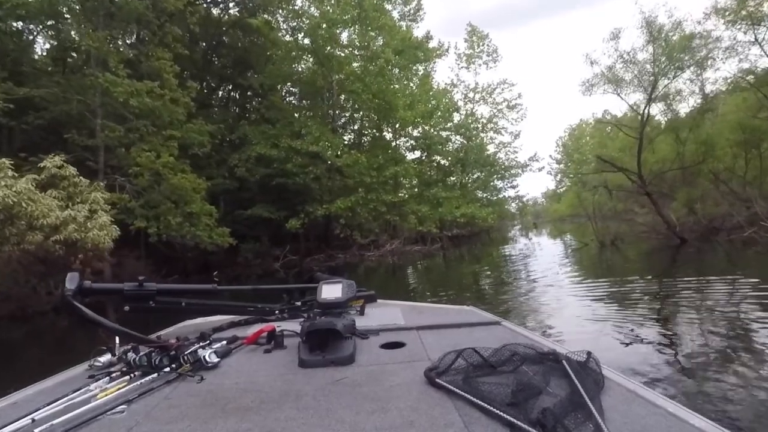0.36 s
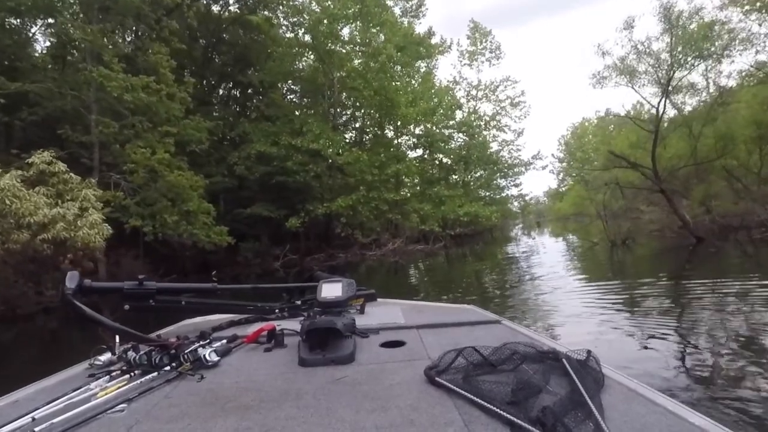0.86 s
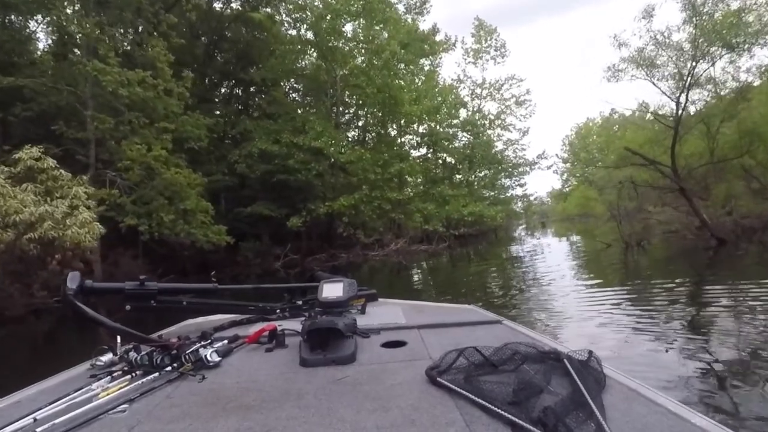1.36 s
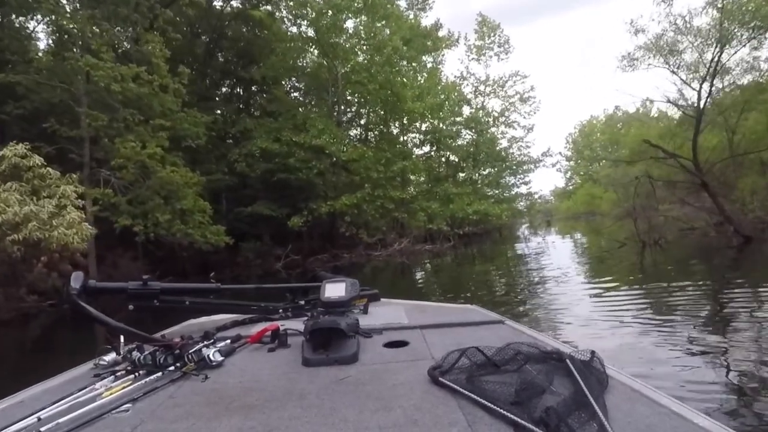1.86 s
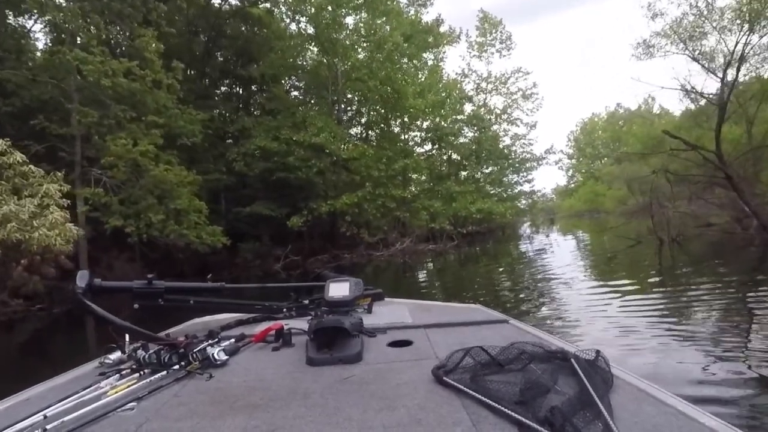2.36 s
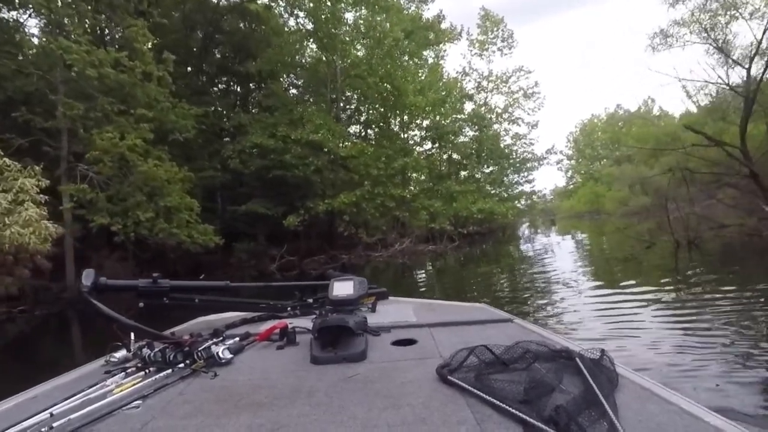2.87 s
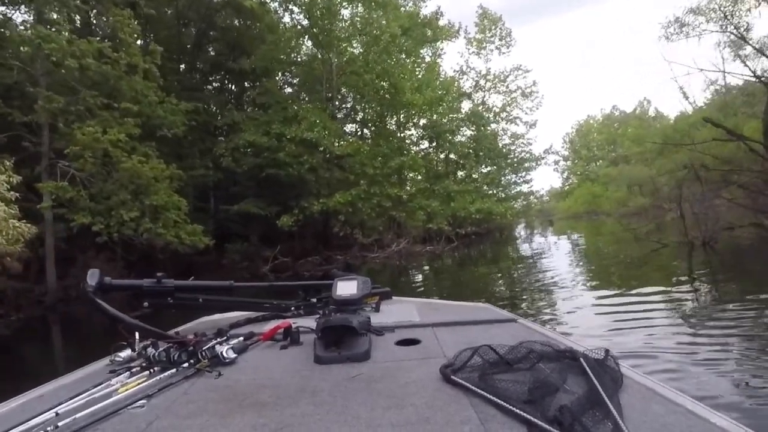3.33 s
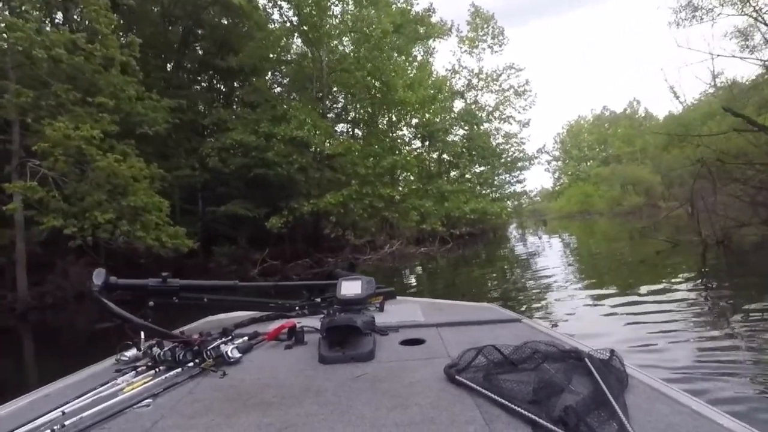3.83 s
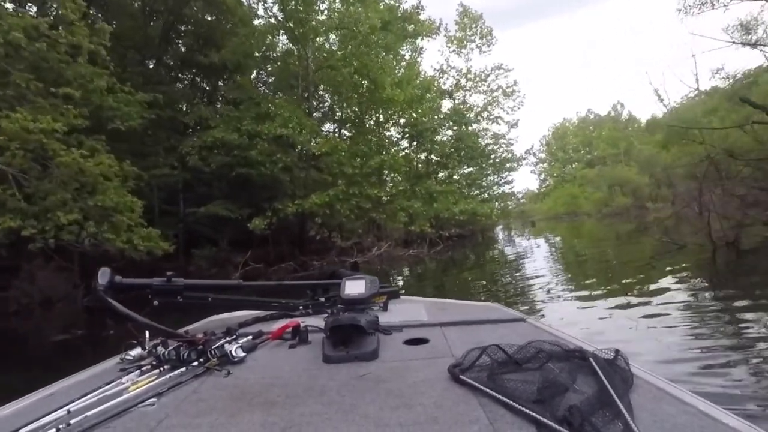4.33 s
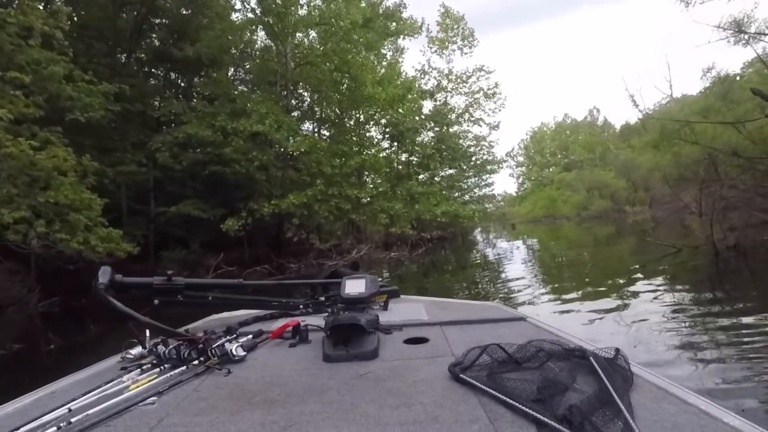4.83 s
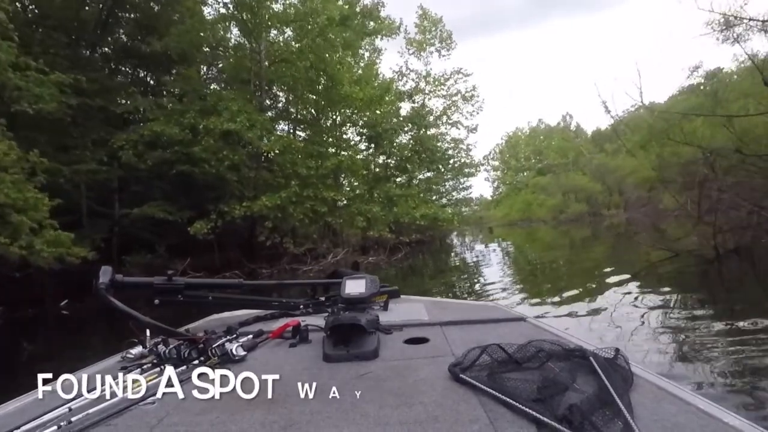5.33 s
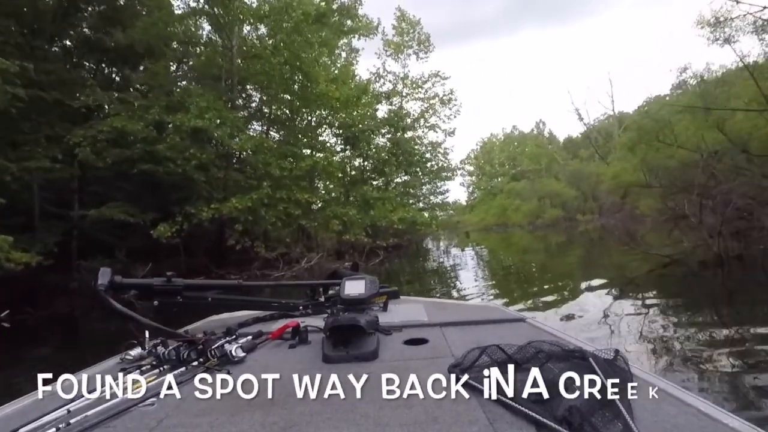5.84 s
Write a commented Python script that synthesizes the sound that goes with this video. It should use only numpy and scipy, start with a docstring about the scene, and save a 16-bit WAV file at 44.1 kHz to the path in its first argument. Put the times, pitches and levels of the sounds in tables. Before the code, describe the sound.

Deep, fluttering boat motor drone with hollow hull booms, irregular deck clunks, small bubbles and spray, and a very faint bird late on.

```python
"""Up a creek, on the deck of a fishing boat with its outboard idling; a small microphone with two ports stands there.
Motor noise runs through deck, hatch and cowl resonances; firings and wavelets keep the hull's low modes
humming, the cowl hisses and ticks with the firings. Padded blows of loose gear ring the deck, a fitting pings.
Bubbles are rising blips, spray is bursts of noise, a far bird whistles falling notes.
Air reaches both ports alike; deck shake moves them in opposition."""
import sys
import numpy as np
from scipy import signal
from scipy.fft import rfft, irfft, next_fast_len
from scipy.io import wavfile
from scipy.ndimage import uniform_filter1d

SR = 44100
rng = np.random.default_rng(int(sys.argv[2]) if len(sys.argv) > 2 else 0)


def transcribe(u):
    """Save the signal u as a 16-bit wav file named by the first command-line argument.

    u: samples, shape (n,) or (channels, n), limited to [-1, 1]; the rate is SR.
    q: integer samples, one column per channel.
    """
    v = np.clip(np.atleast_2d(u).T, -1, 1)
    q = np.round(v * 32767).astype(np.int16)
    wavfile.write(sys.argv[1], SR, q)


def linear_from_db(decibels):
    """Turn decibels (scalar or array-like) into linear amplitude factors; 0 gives 1."""
    return 10 ** (np.asarray(decibels, float) / 20)


N = 262395
T = np.arange(N) / SR

# low modes of the hull: (pitch [Hz], pitch wander [Hz], right port leads by [rad], left minus right [dB])
HULL_MODES = [(40.7, 1.5, 0.89, -1), (71.47, 1.7, 0.25, 2.5), (124, 1.97, 0.94, -1),
              (145.2, 2.617, 0.78, 0), (201.1, 2.963, 0.78, -1)]
# waves shove the hull and ring the modes near their pitch: (time [s], pitch [Hz], level [dB], held [s])
WAVE_SHOVES = [(0.253, 135.5, -20.5, 0.2), (0.281, 71.7, -23, 0.22), (0.46, 141.7, -20.5, 0.062),
               (0.536, 72.7, -17, 0.029), (0.708, 139, -20, 0.04), (0.718, 72, -24, 0.16),
               (1.314, 142.7, -13.5, 0.0), (1.712, 140.7, -20, 0.088), (1.738, 74.7, -16.5, 0.11),
               (1.767, 117, -19, 0.096), (2.18, 156.8, -16, 0.13), (2.806, 138.3, -19, 0.036),
               (2.823, 70.4, -21.5, 0.085), (3.229, 136.6, -15, 0.091), (3.269, 199, -18.5, 0.0065),
               (3.521, 196, -28, 0.016), (3.601, 118, -24, 0.18), (4.26, 149, -25.5, 0.05),
               (4.432, 75.2, -15, 0.074), (4.635, 138.8, -15, 0.00075), (5.077, 144, -14, 0.015),
               (5.121, 70, -22, 0.073), (5.137, 115.6, -14, 0.044), (5.643, 123, -18.5, 0.061),
               (5.822, 127, -16.5, 0.15), (5.823, 71.5, -18, 0.14)]
SHOVE_RISE_S = 0.024
# slow rise and fall of the wash along the hull: (time [s], level [dB])
HULL_WASH = [(0, -3.5), (.5, 0.5), (.85, 2), (1.2, -1), (1.7, 2.5), (2.1, 1), (4.3, 1), (5.95, -1)]
# deck, hatch and cowl resonances, rung by the motor's noise and by every knock: pitch [Hz]
DECK_PITCHES = [27, 84, 105, 210, 244, 335, 400, 478, 565, 683, 967, 1050, 1290, 1370, 1460, 1600, 1850,
                2050, 3300, 5130, 5330, 8930]
# response of each: (width [Hz], level alike at both ports [dB], level opposed [dB])
DECK_RESPONSE = [(12.1, -28.5, -32.5), (10.1, -36.5, -40.5), (10.4, -37.5, -39.5), (28.8, -44, -41.5),
                 (13.6, -53.5, -41.5), (41, -51.5, -48.5), (50, -53.5, -54), (39.5, -61, -57.5),
                 (51.7, -59, -53.5), (46.5, -73.5, -46), (100, -63, -45.5), (84.6, -63.5, -41.5),
                 (120, -56, -48), (85, -59, -49.5), (102, -59, -55.5), (162, -54.5, -64), (152, -60, -68),
                 (152, -65, -71.5), (300, -74.5, -93), (330, -64.5, -66), (260, -71, -61),
                 (160, -75.5, -74.5)]


def walk(rate):
    """Random levels held 1 / rate s and slewed twice; spread near 1."""
    k = int(SR / rate)
    steps = np.repeat(rng.standard_normal(N // k + 1), k)
    return 1.317 * uniform_filter1d(uniform_filter1d(steps, k), k)[:N]


def ring(x, hz, width, count=2):
    """Resonance with gain 1 at its centre, steeper with each pass."""
    b, a = signal.iirpeak(hz, hz / width, SR)
    for _ in range(count):
        x = signal.lfilter(b, a, x)
    return x


def colour(x, table):
    """Filters by a (Hz, dB) table, interpolated over log pitch."""
    hz, db = np.transpose(table)
    size = next_fast_len(N)
    at = np.log(np.arange(size // 2 + 1) * SR / size + 1)
    gain = linear_from_db(np.interp(at, np.log(hz), db))
    return irfft(rfft(x, size) * gain, size)[:N]


def ports(alike, opposed):
    """Left and right port from the shared and the opposed part."""
    return np.array([alike + opposed, alike - opposed])


def bird():
    """A far bird: two quick falling whistles a chirp, a little off to one side."""
    # (time [s], level [dB])
    chirp_list = [(3.982, -46), (4.229, -47), (4.48, -50), (4.73, -51), (4.932, -54)]
    # the two notes of a chirp: (start [s], length [s], from [Hz], to [Hz], level against the chirp [dB])
    note_list = [(0, .026, 4250, 3700, 0), (.02, .024, 3700, 3300, -3)]
    out = np.zeros(N)
    for s, db in chirp_list:
        for start, length, from_hz, to_hz, note_db in note_list:
            n, i = int(length * SR), int((s + start) * SR)
            phase = 2 * np.pi * np.cumsum(np.linspace(from_hz, to_hz, n)) / SR
            out[i:i + n] += linear_from_db(db + note_db) * np.hanning(n) * np.sin(phase)
    return ports(out, 0.52 * out)


def splashes():
    """Brief bursts of spray against the hull: noise that falls off toward the treble."""
    # (time [s], level before colouring [dB])
    splash_list = [(1.424, -45), (2.407, -41), (3.387, -44)]
    out = np.zeros((2, N))
    n = int(0.022 * SR)  # length of a burst
    for s, db in splash_list:
        i = int(s * SR)
        out[:, i:i + n] = linear_from_db(db) * np.hanning(n) * rng.standard_normal((2, n))
    spray = [(900, -20), (2000, 4), (5500, -1), (9000, -22)]  # (pitch [Hz], gain [dB])
    alike, opposed = (colour(v, spray) for v in out)
    return ports(alike, .4 * opposed)


def bubbles():
    """Bubbles ring as short rising blips; small ones come at random, higher ones fainter."""
    # the clearest bubbles in the wash: (time [s], pitch [Hz], level [dB])
    clear_bubbles = [(.555, 1280, -28), (2.047, 1240, -33)]
    decay_cycles = 9.2
    glide = 0.086  # share of the pitch gained over two decay times
    out = np.zeros(N + 2048)
    small = [(5.9 * u, 1100 * 3.4 ** v, -41.5 - 12 * v + 5 * w) for u, v, w in rng.random((160, 3))]
    for s, hz, db in list(clear_bubbles) + small:
        cycles = T[:2048] * hz
        size = (1 - np.exp(-cycles)) * np.exp(-cycles / decay_cycles)
        rising = cycles * (1 + glide * cycles / decay_cycles / 4)
        i = int(s * SR)
        out[i:i + 2048] += linear_from_db(db) * size * np.sin(2 * np.pi * rising)
    return ports(out[:N], 0.3 * out[:N])


def ping():
    """A small metal fitting rings once, with a hard knock: one decaying tone."""
    start_s, hz, level_db, t60_s = 1.325, 3310, -37.5, .075
    since = np.maximum(T - start_s, 0)
    size = linear_from_db(level_db - 60 * since / t60_s) * (1 - np.exp(-since / .003))
    out = size * np.sin(2 * np.pi * hz * since)
    return ports(out, 0.3 * out)


def struck(blow, hz, spread, damp, column):
    """The deck resonances near the blow's pitch answer it, damp times as wide; peak 1."""
    near = np.exp(-(np.log(np.array(DECK_PITCHES) / hz) / spread) ** 2)
    y = 0
    for k, row in enumerate(DECK_RESPONSE):
        if near[k] > .01:
            answer = ring(blow, DECK_PITCHES[k], damp * row[0], count=1) / np.sqrt(row[0])
            # neighbours answer with opposite sign, at half the motor's dB
            y = y + (-1) ** k * near[k] * linear_from_db(0.5 * row[column]) * answer
    return y / np.abs(y).max()


def knocks():
    """A rough, padded blow of a few ms cracks the upper resonances; a slower push thuds the lower ones."""
    # loose gear on the deck: (time [s], level [dB], crack pitch [Hz], thud against that level [dB])
    knock_list = [(0.1525, -36.5, 1490, 11), (0.382, -45, 1300, 23.5), (0.575, -43.5, 900, 19.5),
                  (0.805, -40, 1300, 16.5), (1.322, -17.5, 1470, -4.5), (1.669, -34.5, 1630, -4),
                  (1.9913, -33.5, 1490, 2), (2.2207, -21, 1340, -13), (2.6255, -27, 1560, 1.5),
                  (2.857, -29, 1070, 14.5), (3.2321, -26.5, 1270, 1), (3.275, -28, 1180, 14),
                  (3.7507, -46, 980, 26.5), (3.8095, -25, 1650, -9), (4.4857, -24.5, 1390, -2.5),
                  (4.5877, -17, 1490, -7), (4.6871, -35, 1440, 18), (4.7144, -31, 1430, 4.5),
                  (5.1569, -24.5, 996, 4.5), (5.461, -28, 1420, -7), (5.8137, -37, 920, 17)]
    out, t = np.zeros((2, N + 8192)), T[:8192]
    blow = (1 - np.exp(-t / .001)) * (np.exp(-t / .0025) + .08 * np.exp(-t / .014))
    push = (1 - np.exp(-t / 0.002)) * np.exp(-t / 0.021)
    padding = signal.butter(6, 2300, fs=SR, output="sos")
    # wavelets tap the hull lightly at random
    laps = [(.05 + 5.8 * u, -40 - 6 * v, 900 + 800 * w, 6) for u, v, w in rng.random((40, 3))]
    for s, db, hz, thud_db in list(knock_list) + laps:
        shake_db = 10.5 - 7 * np.log2(hz / 1300)  # low knocks shake the deck more
        rough = rng.standard_normal((4, 8192)) * [blow, blow, push, push]
        crack, shake, thud, thud_shake = signal.sosfilt(padding, rough)
        thud = signal.lfilter(*signal.butter(2, 600, fs=SR), thud)  # the slow push has no rasp
        alike = struck(crack, hz, .17, 1.2, column=1)
        alike = alike + .7 * struck(shake, 1.15 * hz, .45, 3, column=1)
        # hollow sound under the crack
        alike = alike + linear_from_db(-8.5) * struck(crack, 653, 0.22, 5.1, column=1)
        alike = alike + linear_from_db(thud_db) * struck(thud, 225, 0.55, 1.4, column=1)
        opposed = linear_from_db(shake_db) * struck(shake, hz, 1.0, 0.94, column=2)
        opposed = opposed + linear_from_db(thud_db + 3.5) * struck(thud_shake, 530, 0.92, 0.7, column=2)
        i = int((s - .002) * SR)
        out[:, i:i + 8192] += linear_from_db(db) * ports(alike, opposed)
    return out[:, :N]


def shove(s, held, t60):
    """A wave's push on a mode: rise, hold, then the ring dies away."""
    since = T - s - SHOVE_RISE_S
    rise = np.clip(1 + since / SHOVE_RISE_S, 0, 1)
    return rise * linear_from_db(-60 * np.maximum(since - held, 0) / t60)


def ringing():
    """Level of each hull mode: the firing tone, then the upper modes at rest plus the shoves near them."""
    # strength of the firing tone in the hull: (time [s], level [dB])
    firing_level = [(0.0, -15.5), (0.08, -15.5), (0.16, -35), (0.41, -12.5), (0.6, -24.5), (0.66, -21.5),
                    (1.67, -12.5), (1.85, -26.5), (2.27, -24), (2.37, -15), (3.68, -20), (4.08, -29.5),
                    (4.17, -16.5), (4.37, -15), (5.19, -13.5), (5.6, -43), (5.67, -12.5), (5.95, -43)]
    # the upper modes: (ring t60 [s], resting level [dB])
    mode_rings = [(1.15, -32), (0.54, -40), (0.24, -34), (0.24, -37.5)]
    shove_spread = 0.098  # in log pitch
    firing_db = np.interp(T, *np.transpose(firing_level)) + 1 * walk(8.6)
    out = [linear_from_db(firing_db)]
    for (mode_hz, *_), (t60, rest_db) in zip(HULL_MODES[1:], mode_rings):
        power = linear_from_db(rest_db + 4.5 * walk(13)) ** 2
        for s, hz, db, held in WAVE_SHOVES:
            near = np.exp(-(np.log(mode_hz / hz) / shove_spread) ** 2)
            if near > .01:
                power = power + (near * linear_from_db(db) * shove(s, held, t60)) ** 2
        out.append(np.sqrt(power))
    return out


def hull():
    """Each mode is a tone that wanders in pitch; the two ports feel it at different phase."""
    out = 0
    for (hz, wander, lead, pan_db), size in zip(HULL_MODES, ringing()):
        phase = 2 * np.pi * np.cumsum(hz + wander * walk(9)) / SR
        pan = linear_from_db(np.array([[pan_db], [-pan_db]]) / 2)
        both = pan * np.sin(phase + np.array([[-lead], [lead]]) / 2)
        # size is the rms of what the ports share, but for the pan
        out = out + np.sqrt(2) * size * both / np.cos(lead / 2)
    return out


def ticks(turns):
    """Something loose in the cowl: a short two-tone ring at every firing, mostly faint, now and then clear."""
    # the clearest ticks: (time [s], pitch [Hz], level before a 6 dB lift [dB])
    clear_ticks = [(2.051, 2800, -39), (2.099, 3450, -37)]
    out, t = np.zeros(N + 2048), T[:2048]
    fired = np.flatnonzero(np.diff(np.floor(turns))) / SR
    draws = rng.standard_normal((400, 2))
    faint = [(s, 3080 * 1.12 ** u, -51 + 9 * min(v, 1.2)) for s, (u, v) in zip(fired, draws)]
    size = (1 - np.exp(-t / .001)) * np.exp(-t / 0.0017)
    for s, hz, db in list(clear_ticks) + faint:
        i = int(s * SR)
        tones = np.sin(2 * np.pi * hz * t) + .5 * np.sin(3 * np.pi * hz * t)
        out[i:i + 2048] += linear_from_db(db + 6) * size * tones
    return ports(out[:N], .15 * out[:N])


def load():
    """Swell of the mid-range clatter in dB: up while waves push the upper hull modes, on top of the wash."""
    calm_db, swell_db, slew_s = -1.9, 2, 0.1
    pushed = sum((T > s) & (T < s + SHOVE_RISE_S + held) for s, hz, db, held in WAVE_SHOVES if hz > 100)
    k = int(slew_s * SR)
    slewed = uniform_filter1d(uniform_filter1d(1. * pushed, k), k)
    return calm_db + np.interp(T, *np.transpose(HULL_WASH)) + swell_db * slewed


def motor():
    """Near steady in the bass, swelling with load above, a puff per firing in the treble; resonances flicker."""
    # broad motor and water noise that reaches both ports alike: (pitch [Hz], level [dB per Hz])
    alike_noise = [(15, -25), (50, -47.5), (160, -49), (220, -54), (380, -64), (480, -74.5), (900, -78.5),
                   (1500, -80.5), (2300, -89.5), (3200, -88), (5500, -95), (10000, -105), (15000, -120)]
    # the same for noise that moves the ports in opposition: (pitch [Hz], level [dB per Hz])
    opposed_noise = [(15, -48), (40, -44), (110, -61.5), (250, -59.5), (420, -70), (550, -75), (800, -75),
                     (1400, -87.5), (1750, -87.5), (2300, -91.5), (4800, -99), (10000, -103), (15000, -120)]
    firing_hz = 42.3
    turns = np.cumsum(firing_hz * (1 + 0.035 * walk(4.4))) / SR
    cycle = np.cos(2 * np.pi * turns) + 0.6 * np.sin(4 * np.pi * turns)
    cycle = cycle * np.maximum(1 + 0.74 * walk(25), 0)  # firings differ in puff depth
    load_db = load()
    wash_db = np.interp(T, *np.transpose(HULL_WASH))
    parts = []
    for column, table, depth_db in ((1, alike_noise, 0.75), (2, opposed_noise, 0.6)):
        bass = linear_from_db(1.5 * walk(6))
        body = linear_from_db(load_db + 1.9 * walk(14))
        # the hiss wavers by about a dB, some ten times a second
        treble = linear_from_db(depth_db * cycle + 1.0 * walk(9.6) + .5 * wash_db)
        noise = rng.standard_normal(N)
        below_230, below_2200 = [signal.sosfilt(signal.butter(2, hz, fs=SR, output="sos"), noise)
                                 for hz in (230, 2200)]
        broad = bass * below_230 + body * (below_2200 - below_230) + treble * (noise - below_2200)
        y = colour(broad, table) * np.sqrt(SR / 2)
        for hz, row in zip(DECK_PITCHES, DECK_RESPONSE):
            if hz < 150:
                gate = bass
            elif hz < 230:
                gate = bass * linear_from_db(0.41 * load_db)  # part of the swell reaches this low
            elif hz < 2200:
                gate = body
            else:
                gate = treble ** 1.5
            flicker_db = 3 if 150 < hz < 2200 else 1
            # resonant noise of rms 1, then gated
            unit = gate * ring(rng.standard_normal(N), hz, row[0]) * np.sqrt(2 * SR / np.pi / row[0])
            y = y + linear_from_db(row[column] + flicker_db * walk(9)) * unit
        parts.append(y)
    return ports(*parts) + ticks(turns)


def scene():
    """Everything heard on deck, from the far bird to the motor."""
    return bird() + splashes() + bubbles() + ping() + knocks() + hull() + motor()


def top_cut(x):
    """Nothing passes above the cut-off."""
    return signal.sosfilt(signal.butter(12, 14960, fs=SR, output="sos"), x)


def record(dry):
    """The microphone: two ports of unequal colour, a bass cut and soft overload."""
    # (pitch [Hz], left minus right [dB])
    port_lean = [(150, -1), (260, -3), (450, -2.5), (700, 3), (1300, 1), (1500, -2.5), (5300, 1),
                 (8900, -4), (14000, -5)]
    hz, db = np.transpose(port_lean)
    both = np.array([colour(v, np.transpose([hz, sign * db / 2])) for v, sign in zip(dry, (1, -1))])
    both = signal.sosfilt(signal.butter(3, 21, "high", fs=SR, output="sos"), both)
    both = 1.1 * np.tanh(both / 1.1)  # the loudest peaks are rounded
    return top_cut(both)


dry = scene()
out = record(dry)
transcribe(out)
```